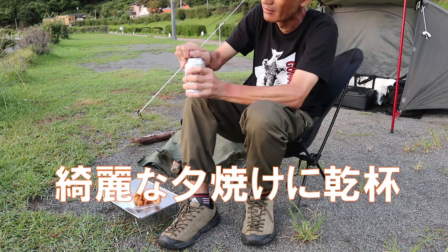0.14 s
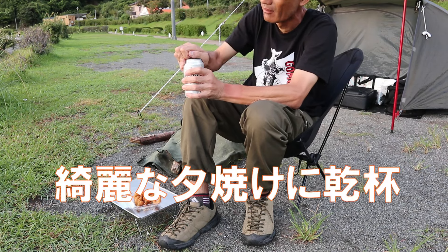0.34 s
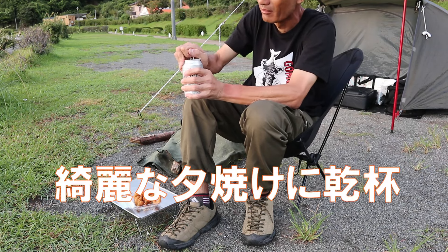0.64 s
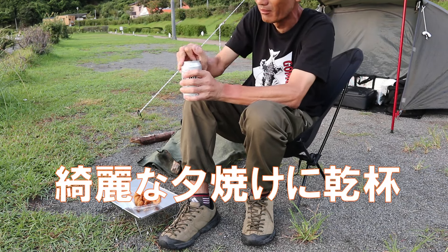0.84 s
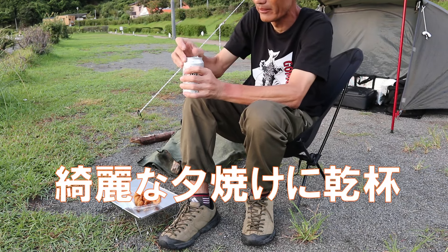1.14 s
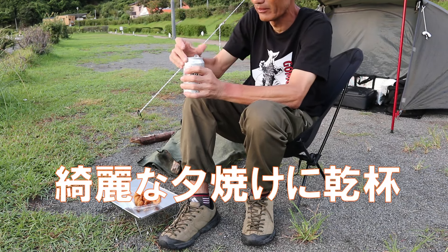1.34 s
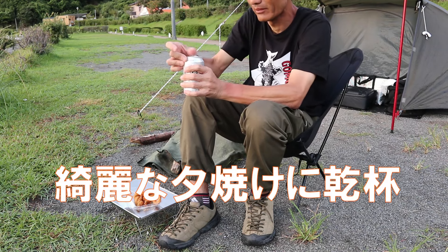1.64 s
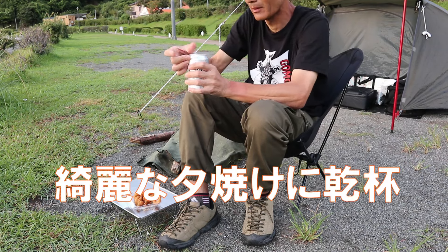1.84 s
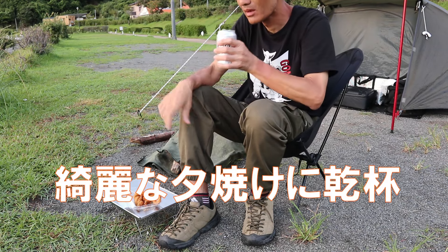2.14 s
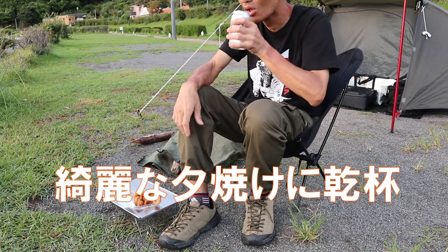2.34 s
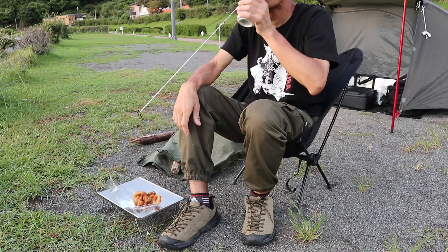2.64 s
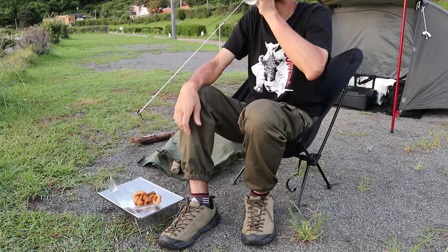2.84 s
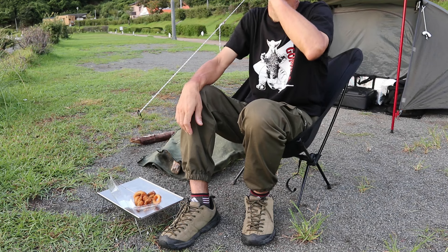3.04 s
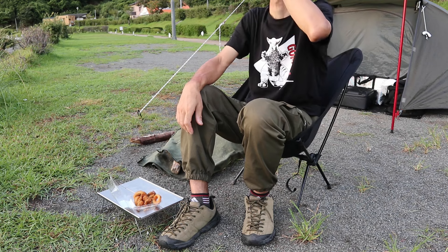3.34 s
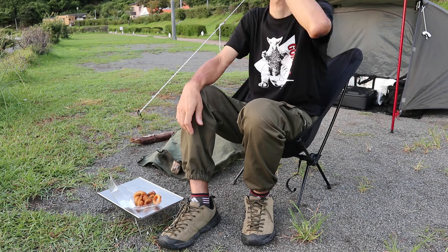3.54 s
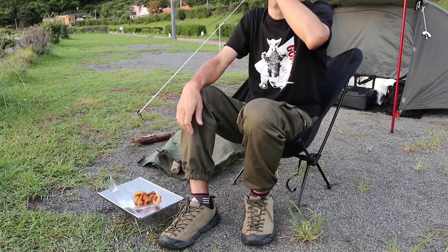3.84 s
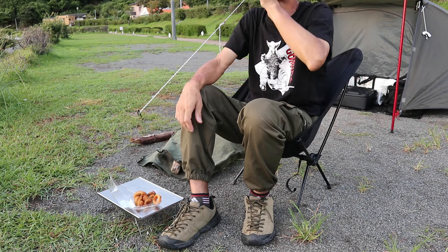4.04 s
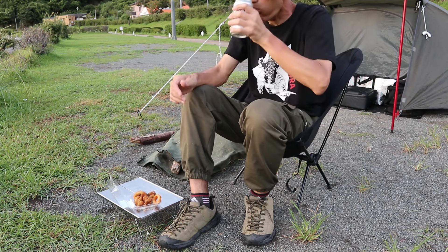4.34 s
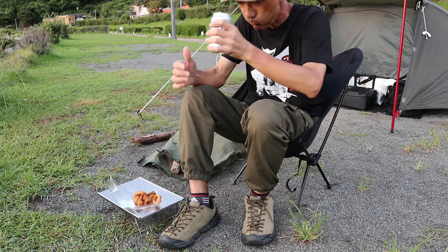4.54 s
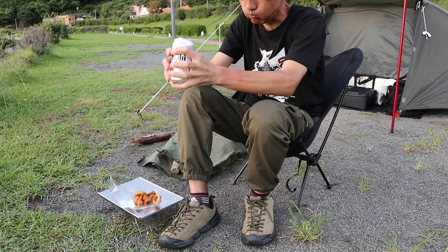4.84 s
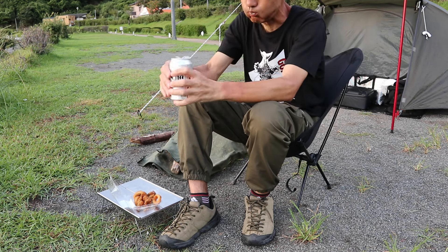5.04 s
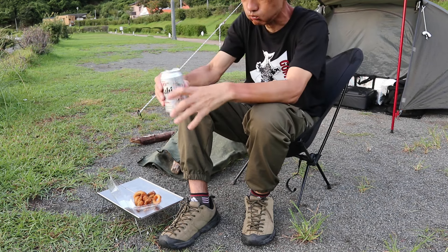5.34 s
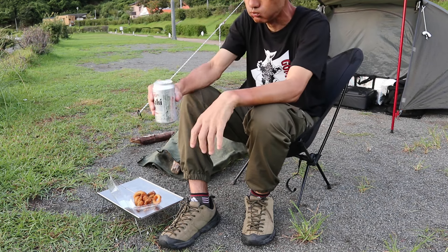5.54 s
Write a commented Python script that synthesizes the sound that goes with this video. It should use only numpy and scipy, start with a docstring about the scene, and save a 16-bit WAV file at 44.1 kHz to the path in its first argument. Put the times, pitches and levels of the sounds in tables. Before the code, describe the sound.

A quiet outdoor background opens with even leafy hiss, distant road rumble, a faint cicada note and a blurred rising bird call. At 0.34 s a drink can very close, slightly left, cracks and spurts gas for about a tenth of a second. A hard metallic snap follows at 0.42, a lesser one at 0.58, and a loud punch at 0.69, with fine tearing crackle between and small ticks until 0.87. The background ducks, then slowly recovers. Barely audible foam fizz dies quickly after 1 s. Soft cloth swishes come near 1.6, 2.0 and 4.65 s, and a tiny tick at 3.5. Cicadas buzz in gliding notes and pulses throughout; birds call at 1.2 and 2.2 s, with thin high chirps at 1.7, 2.9 and 5.1. Tyre roar swells around 2.6. A low engine drone fades in and out, rises slightly, then from 4 s grows stronger and falls in pitch to the end.

```python
"""A beer can is opened close to the microphone at a campsite: ringing metal snaps, a noisy jet of gas and fine crackle.
Around it, cloth swishes in filtered noise, and an engine drone of summed sine orders grows and ends lower in pitch.
Coloured noise makes the tyres and rumble of a far road; cicadas and birds are blurred gliding tones in the trees.
The recorder's limiter ducks the background after the loudest snaps."""
import sys
import numpy as np
from scipy import signal
from scipy.fft import rfft, irfft
from scipy.io import wavfile
from scipy.ndimage import uniform_filter1d, minimum_filter1d

SR = 44100
rng = np.random.default_rng(int(sys.argv[2]) if len(sys.argv) > 2 else 0)


def master(y):
    """Save y as 16-bit WAV."""
    cut = np.clip(np.atleast_2d(y).T, -1, 1)
    pcm = np.round(cut * 32767)  # scale
    wavfile.write(sys.argv[1], SR, pcm.astype(np.int16))


N = 251370
T = np.arange(N) / SR  # s
HZ = np.fft.rfftfreq(N, 1 / SR)

# Ringing modes of the lid and tab. Each row: pitch in Hz, relative level in dB, time to fall 60 dB in seconds.
LID_MODES = [(594, 10.5, 0.0038), (1200, -12.5, 0.015), (1464, 0, 0.013), (2370, -17, 0.011),
             (3190, -2, 0.0029), (3636, -22.5, 0.015), (4220, -7, 0.0032), (4745, -13, 0.0096),
             (5160, -8.5, 0.0023), (5790, -15, 0.01), (6600, -13, 0.0068), (7900, -18.5, 0.01),
             (8960, -17.5, 0.014), (11200, -12, 0.0033)]
# Snaps of the metal. Each row: start in seconds, flex of the lid in dB, tear in dB, pitch of the tear in Hz,
# spread over the modes in octaves.
METAL_SNAPS = [(0.3367, -28.5, 7, 5840, 0.51), (0.339, -36, -1, 11050, .15),
               (0.3385, -42, 15.5, 3790, 0.11), (0.4244, 8.5, 11, 3540, 0.46),
               (0.4254, -17, -5, 4450, 0.55), (.442, -21, -22, 4000, 1.1), (0.479, -21, -40, 5000, 0.25),
               (0.5809, -7.5, 5.5, 4915, 0.18), (0.5813, -51, -12, 10480, 0.4), (.598, -37, -27, 7100, 1.6),
               (.604, -40, -36, 7000, 1.5), (0.636, -29, -15, 8800, 0.5), (.644, -28, -23, 6460, 1.1),
               (.649, -32, -33, 7000, 1.2), (.675, -26, -43, 5830, 0.89), (0.6891, 7.5, 7.5, 5550, 1.42),
               (0.699, -31, -17, 5000, 0.45), (0.723, -42, -29, 6500, 1.4), (0.7444, -23, -36, 5040, 0.25),
               (.779, -35, -30, 6470, 1.2), (.849, -32, -29, 4500, 1.2), (3.511, -35, -27, 11500, 0.41)]
FLEX_HZ = 1563
# the lid hardly radiates between its low and its high modes: pitch of that gap and its sharpness
GAP_HZ, GAP_Q = 2120, 1.27
# the flap rings once as it is punched into the can
FLAP_S, FLAP_HZ, FLAP_DB, FLAP_T60_S = .6894, 2110, -4, 0.0046


def snaps(radiation_hz=700, edge_hz=12300, rip_db=-13, rip_hz=9000, rip_s=0.0017):
    """Each snap flexes the whole lid (low modes) and tears the metal at one pitch (high modes and a brief rip)."""
    hz, db, t60 = np.transpose(LID_MODES)
    t = np.arange(SR // 10) / SR
    out = np.zeros(N)
    decay = np.exp(-np.log(1000) * t / t60[:, None])
    modes = amp(db)[:, None] * decay * np.sin(2 * np.pi * hz[:, None] * t)
    # the higher modes swing in alternate directions
    high = hz > 2000
    modes[high] *= (-1) ** np.arange(np.sum(high))[:, None]
    for s, flex_db, tear_db, tear_hz, spread in METAL_SNAPS:
        flex = amp(flex_db) * share(hz, FLEX_HZ, spread)
        tear = amp(tear_db) * share(hz, tear_hz, spread)
        rip = cut(rng.standard_normal(len(t)) * np.exp(-t / rip_s), rip_hz, "highpass")
        rip_level = amp(tear_db + rip_db) * share(rip_hz, tear_hz, spread)
        add(out, s, (flex + tear) @ modes + rip_level * rip)
    out = signal.lfilter(*signal.iirnotch(GAP_HZ, GAP_Q, SR), out)
    flap_decay = np.exp(-np.log(1000) * t / FLAP_T60_S)
    add(out, FLAP_S, amp(FLAP_DB) * flap_decay * np.sin(2 * np.pi * FLAP_HZ * t))
    # so small a lid radiates no bass, and no tear is perfectly sudden
    return cut(cut(out, radiation_hz, "highpass"), edge_hz, "lowpass", order=5)


# Colour of the escaping jet. Each row: frequency in Hz, relative level in dB per Hz.
JET_COLOUR = [(150, -26), (450, -8), (650, -1), (850, -5.5), (1150, -7), (2000, -12), (2500, -7),
              (3200, -2), (3900, -5), (5200, -0.5), (6200, -3.5), (7600, -8.5), (9800, 1.5), (12000, -0.5),
              (13500, -9), (16000, -42)]
# The jet surges as the tab is levered further, then runs out. Each row: time in seconds, level in dB.
JET_FLOW = [(.337, -18), (.342, -30), (.347, -24.5), (.361, -25), (.37, -24), (.385, -26.5), (.401, -30),
            (.42, -32.5), (.44, -41), (.5, -86)]
# the gas escapes from the moment the seal cracks; its hum sags, then dies fast after the hold
SEAL_S, GAS_ATTACK_S, GAS_HOLD_S = .3365, 0.0023, 0.079
HUM_DB, HUM_SAG_DB_PER_S, HUM_RELEASE_DB_PER_S = -34.5, 34, 330
SLIT_NARROW_HZ, SLIT_WIDE_HZ, SLIT_WIDENS_S = 6200, 4780, 0.029


def gas(whistle_db=-7, upper_mode=1.87, spray_db=-6, drops_per_s=900):
    """A sputtering jet full of droplets, whose two rough whistles sink as the slit widens; it also makes the can hum."""
    age, spent = since(SEAL_S), since(SEAL_S + GAS_HOLD_S)
    hum_db = HUM_DB - HUM_SAG_DB_PER_S * age - HUM_RELEASE_DB_PER_S * spent
    slit_hz = SLIT_WIDE_HZ + (SLIT_NARROW_HZ - SLIT_WIDE_HZ) * np.exp(-age / SLIT_WIDENS_S)
    whistles = fuzzy(slit_hz, width=1700) + fuzzy(upper_mode * slit_hz, width=380)
    drops = unit(rng.standard_normal(N) * (rng.random(N) < drops_per_s / SR))
    rush = rng.standard_normal(N) + amp(spray_db) * drops
    hiss = unit(irfft(rfft(rush) * amp(read(JET_COLOUR, HZ)), N))
    jet = unit(hiss + amp(whistle_db) * whistles)
    hum = unit(fuzzy(np.full(N, 1520.), width=360) + amp(-10.5) * fuzzy(np.full(N, 1150.), width=210))
    sputter_db = 2.0 * wander(rate_hz=250)
    onset = np.minimum(age / GAS_ATTACK_S, 1)
    return (jet * amp(curve(JET_FLOW) + sputter_db) + hum * amp(hum_db)) * onset


# Bursts of fine crackle as the score line tears and the tab is bent back.
# Each row: peak time in seconds, level in dB before the tick and ring trims.
TEAR_BURSTS = [(.586, -38), (.628, -47), (0.64, -37), (.676, -61), (.697, -35), (.710, -38), (.853, -46),
               (.866, -52)]
TEAR_RISE_DB_PER_S, TEAR_FALL_DB_PER_S, RING_FALL_DB_PER_S = 2800, 1400, 850
# the foam settles in the open can; its level is also before the trims
FOAM_S, FOAM_DB, FOAM_FALL_DB_PER_S = 1, -66, 62


def crackle(per_s=3000, tick_db=-4, ring_db=-2):
    """Tiny random ticks of tearing metal and settling foam; the lid's ring outlasts each burst."""
    ticks = rng.standard_normal(N) * (rng.random(N) < per_s / SR)
    bright = unit(cut(cut(ticks, hz=2800, kind="highpass"), hz=10700, kind="lowpass", order=8))
    ring = unit(resonate(resonate(ticks, 1430, width=170), 1730, width=210))

    def bursts(fall):
        return sum(amp(db - np.maximum(TEAR_RISE_DB_PER_S * (s - T), fall * (T - s))) for s, db in TEAR_BURSTS)

    tearing, ringing = bursts(TEAR_FALL_DB_PER_S), bursts(RING_FALL_DB_PER_S)
    foam = amp(FOAM_DB - FOAM_FALL_DB_PER_S * since(FOAM_S)) * (T > FOAM_S)
    return amp(tick_db) * bright * (tearing + foam) + amp(ring_db) * ring * (ringing + foam)


# Clothes brush as the arms move. Each row: middle in seconds, width to either side in seconds, level in dB.
CLOTH_STROKES = [(1.605, 0.022, -63), (1.977, .07, -64), (4.655, .025, -62)]


def clothes(low_hz=5000, high_hz=12000, grain_db=3):
    """Soft, grainy swishes of cloth: band-limited noise, unevenly loud, under bell-shaped strokes."""
    fibres = cut(cut(rng.standard_normal(N), low_hz, "highpass"), high_hz, "lowpass", order=8)
    strokes = sum(amp(db) * np.exp(-((T - s) / width) ** 2) for s, width, db in CLOTH_STROKES)
    return unit(fibres * amp(grain_db * wander(rate_hz=120))) * strokes


def campsite(x, echo_s=0.001873, echo_gain=0.67, echo_hz=2300, scatter_db=-28, t60=0.27, left_db=4.0):
    """The chest behind the can sends back one dull echo; ground, chair and tent scatter a faint tail."""
    echo = echo_gain * np.exp(-2j * np.pi * HZ * echo_s) / (1 + (HZ / echo_hz) ** 2)
    direct = rfft(x) * (1 + echo)
    # the can is a little to the left: earlier there, and louder in the treble
    lean = amp(left_db / 2 * HZ / (HZ + 900))
    lag = np.exp(-2j * np.pi * HZ * 1e-5)
    near = irfft(np.array([direct * lean, direct * lag / lean]), N)
    t = np.arange(SR // 2) / SR
    sparse = rng.standard_normal((2, len(t))) * (rng.random((2, len(t))) < .08)
    taps = sparse * (t > .004) * np.exp(-np.log(1000) * t / t60)
    taps /= np.linalg.norm(taps, axis=1, keepdims=True)
    return near + amp(scatter_db) * signal.fftconvolve(x[None], taps, axes=1)[:, :N]


# The engine's firing rate, before a slight wobble. Each row: time in seconds, rate in Hz.
FIRING_RATE = [(0, 85.18), (1.5, 84.8), (2.2, 87.1), (3.3, 88.6), (4.05, 86.9), (4.55, 81.27), (5.7, 74.3)]
# Its deepest tone, which fades in and out on its way over the ground.
# Each row: time in seconds, level in dB before trim and flutter.
DEEP_TONE = [(0.0, -49), (0.22, -80), (0.28, -43.5), (1.24, -57), (1.51, -38.5), (1.63, -55.5), (2.18, -37),
             (2.36, -57), (2.4, -43), (2.79, -42), (2.86, -33), (3.49, -35.5), (3.68, -48), (3.86, -35),
             (4.08, -31), (4.16, -39.5), (4.3, -29), (4.7, -31.5), (5.02, -26), (5.16, -30), (5.7, -29)]
# Its orders. Each row: multiple of the firing rate, relative level in dB.
ENGINE_ORDERS = [(1.25, -15.5), (1.751, -14.5), (2, -8.5), (2.75, -14), (3, -16), (4, -28)]
# Its overtones come forward as the exhaust opens up.
# Each row: time in seconds, gain of the low overtones in dB, gain of the high overtones in dB.
OVERTONE_GAINS = [(0, -40, -48), (.18, -40.5, -36), (.4, -45, -51), (1.2, -45, -57), (2.1, -44.5, -43),
                  (2.42, -40.5, -36.5), (2.7, -40.5, -43.5), (4.05, -40, -40.5), (4.36, -37.5, -24.5),
                  (4.65, -30, -32), (5, -34, -33.5), (5.7, -26.5, -28)]


def engine(drone_db=-0.5, flutter_db=1.0, fading_db=1.9, lag_s=4.5e-5):
    """Exhaust orders share one pitch, which rises a little, then falls; the left side hears it a little earlier."""
    turns = np.cumsum(curve(FIRING_RATE) * (1 + 0.00475 * wander(rate_hz=8.8))) / SR
    low, high = amp(curve(OVERTONE_GAINS))
    drone_level = amp(curve(DEEP_TONE) + drone_db + flutter_db * wander(rate_hz=3.6))
    sound = np.sin(2 * np.pi * turns) * drone_level
    for k, db in ENGINE_ORDERS:
        level = (low if round(k) <= 2 else high) * amp(db + fading_db * wander(rate_hz=5.2))
        sound += level * np.sin(2 * np.pi * k * turns + 0.58 * wander(rate_hz=1.9))
    return np.sqrt(2) * np.array([sound, np.interp(T - lag_s, T, sound)])


# Cicada notes. Each row: start in seconds, length in seconds, pitch in Hz, glide in Hz per second,
# level in dB before trim and flutter.
CICADA_NOTES = [(0.149, .2, 3500, 2300, -58), (.84, 0.28, 4870, 1000, -60), (1.033, 0.22, 4830, -3000, -60),
                (1.25, .17, 3350, 3700, -60), (1.385, 0.24, 4310, 800, -56), (1.672, 0.51, 4440, -280, -57),
                (2.457, 0.21, 5490, -900, -57), (2.63, 0.17, 4800, -1300, -59),
                (2.757, 0.21, 4540, -3500, -54), (3.0, .1, 3950, 7500, -62), (3.058, 0.11, 4840, 0, -55.5),
                (3.116, 0.3, 4540, -1900, -55.5), (3.645, 0.15, 4850, 400, -56),
                (3.752, 0.12, 4370, -200, -53), (3.851, .22, 4420, 207, -54),
                (4.027, 0.41, 4410, -560, -51.5), (4.42, 0.12, 4170, -4000, -56),
                (4.907, 0.32, 4500, 197, -55), (5.212, 0.39, 4310, -450, -55.5),
                (5.559, 0.15, 4210, -4200, -56)]
# Trains of short pulses. Each row: start in seconds, length in seconds.
PULSE_TRAINS = [(0.037, .29), (1.514, .63), (3.17, .4), (4.592, .4)]
PULSE_PERIOD_S = 0.119
# every note scoops up to its pitch as it swells and droops as it fades (fractions of the pitch)
NOTE_ATTACK_S, NOTE_RELEASE_S, SCOOP, DROOP = 0.0409, 0.042, 0.0347, 0.047
# above the usual pitch, the higher the note, the rougher: blur grows by this power
BLUR_HZ, USUAL_HZ, BLUR_GROWTH = 55.8, 4383, 5.1


def cicada(song_db=-0.5, pulse_db=-57.5, pulse_hz=5090, pulse_s=0.024, chorus_db=-66, chorus_hz=5130):
    """A narrow, fluttering buzz in gliding notes, with trains of short pulses, over a thin far chorus."""
    song = np.zeros(N)
    for s, length, hz, glide_hz_per_s, db in CICADA_NOTES:
        blur_hz = BLUR_HZ * max(hz / USUAL_HZ, 1) ** BLUR_GROWTH
        t = np.arange(0, length, 1 / SR)
        swell = np.minimum(t / NOTE_ATTACK_S, 1)
        fade = np.minimum((length - t) / NOTE_RELEASE_S, 1)
        bend = 1 - SCOOP * (1 - swell) ** 2 - DROOP * (1 - fade) ** 2
        pitch = (hz + glide_hz_per_s * t) * bend
        add(song, s, amp(db) * np.sqrt(swell * fade) * buzz(pitch, blur_hz))
    flutter_db = 2.0 * wander(rate_hz=30)
    beats = np.concatenate([s + np.arange(0, length, PULSE_PERIOD_S) for s, length in PULSE_TRAINS])
    envelope = sum(np.exp(-((T - s) / pulse_s) ** 2) for s in beats)
    pulses = fuzzy(np.full(N, pulse_hz), width=210) * envelope * amp(pulse_db)
    chorus = amp(chorus_db) * fuzzy(np.full(N, chorus_hz), width=200)
    return song * amp(song_db + flutter_db) + pulses + chorus


# Bird calls. Each row: start in seconds, length in seconds, start pitch in Hz, end pitch in Hz,
# curl (above 1 the glide comes late), level in dB before the ragged wavering.
BIRD_CALLS = [(0.049, 0.3, 1690, 2290, 1.9, -56), (1.239, 0.23, 1730, 2750, 3.85, -54),
              (1.672, 0.11, 7150, 7600, .6, -62), (2.239, 0.26, 1777, 2120, 1.8, -51),
              (2.933, 0.125, 7050, 7750, .7, -60.5), (5.064, .13, 7100, 7700, .6, -60.5)]


def birds(blur=0.06, ragged_db=2):
    """Far calls that glide upward, blurred and made ragged by the trees."""
    out = np.zeros(N)
    for s, length, start_hz, end_hz, curl, db in BIRD_CALLS:
        u = np.linspace(0, 1, int(length * SR))
        hz = start_hz + (end_hz - start_hz) * u ** abs(curl)
        add(out, s, amp(db) * fuzzy(hz, width=blur * start_hz) * signal.windows.tukey(len(hz), .3))
    return out * amp(ragged_db * wander(rate_hz=28))


def trees(source, shared=0.34):
    """A caller in the trees: part of its sound is common to both ears, the rest comes scattered."""
    shared = np.clip(shared, 0, 1)
    return np.sqrt(shared) * source() + np.sqrt(1 - shared) * np.array([source(), source()])


# Low rumble of the traffic. Each row: frequency in Hz, relative level in dB per Hz.
RUMBLE_COLOUR = [(15, -1), (30, -18), (60, 4.5), (90, -0.5), (125, 2), (170, -3.5), (235, -0.5),
                 (300, -9.5), (420, -24.5), (900, -50.5)]
# Tyre roar of near vehicles. Each row: frequency in Hz, relative level in dB per Hz.
NEAR_TYRES = [(100, -30), (330, -0.5), (520, 0.5), (850, 0.5), (1300, -4), (2000, -9), (3000, -15.5),
              (5000, -24), (9000, -47)]
# Tyre roar of far vehicles. Each row: frequency in Hz, relative level in dB per Hz.
FAR_TYRES = [(100, -3), (330, -6.5), (500, -7), (900, 2.5), (1100, -0.5), (1500, -9), (2300, -12.5),
             (3500, -20.5), (7000, -50)]
# Vehicles on the road. Each row: time when closest in seconds, tyre roar in dB,
# time taken to swell or fade in seconds, share of the near spectrum from 0 to 1.
VEHICLES = [(2.58, -41.5, 0.63, 0.93), (4.55, -45, 2.18, 0)]
# the rumble grows steadily; the rest of the road roars evenly, all in the near spectrum
RUMBLE_DB, RUMBLE_RISE_DB_PER_S = -47.5, 1.96
ROAD_DB, ROAD_NEAR = -54, 1


def road(falloff=2.62):
    """Rumble, and tyre roar that swells and fades as each vehicle goes by, broader for a near one."""
    powers = [amp(db) ** 2 / (1 + ((T - s) / swell_s) ** 2) ** falloff for s, db, swell_s, _ in VEHICLES]
    powers = np.array(powers + [np.full(N, amp(ROAD_DB) ** 2)])
    near = np.clip([row[-1] for row in VEHICLES] + [ROAD_NEAR], 0, 1)
    near_roar = np.sqrt(near @ powers) * diffuse(NEAR_TYRES)
    far_roar = np.sqrt((1 - near) @ powers) * diffuse(FAR_TYRES)
    rumble_db = RUMBLE_DB + RUMBLE_RISE_DB_PER_S * T + 0.84 * wander(rate_hz=7.5)
    rumble = diffuse(RUMBLE_COLOUR) * amp(rumble_db)
    return rumble + (near_roar + far_roar) * amp(0.45 * wander(rate_hz=35))


# Hiss of leaves and far insects. Each row: frequency in Hz, relative level in dB per Hz.
AIR_COLOUR = [(200, -3), (900, 5), (1300, -2), (2000, 3.5), (3000, -2.5), (4000, -1.5), (4800, -1.5),
              (5200, -5.5), (5700, -6.5), (6300, -3.5), (7300, -10.5), (10500, -13.5), (13000, -26.5),
              (16000, -46.5)]


def air(level_db=-49.0):
    """An even hiss of leaves and far insects: steady coloured stereo noise."""
    return amp(level_db) * diffuse(AIR_COLOUR)


# Correlation of left and right in the background noise: alike in the bass, opposed in the highest treble.
# Each row: frequency in Hz, correlation from -1 to 1.
LEFT_RIGHT_CORRELATION = [(60, 0.99), (130, 1), (290, 0.77), (640, 0.52), (1400, 0.52), (3100, 0.22),
                          (7000, -0.26), (15000, -1)]


def diffuse(spectrum):
    """Coloured stereo noise: left and right alike in the bass, increasingly opposed in the treble."""
    a, b = rfft(rng.standard_normal((2, N)))
    same = np.clip(read(LEFT_RIGHT_CORRELATION, HZ), -1, 1)
    mid, side = a * np.sqrt(1 + same), b * np.sqrt(1 - same)
    return unit(irfft(np.array([mid + side, mid - side]) * amp(read(spectrum, HZ)), N))


def amp(db):
    """Decibels to gain."""
    return 10 ** (np.asarray(db) / 20)


def unit(x):
    """Scales to rms 1."""
    return x / np.sqrt(np.mean(x ** 2) + 1e-20)


def curve(rows):
    """Every column of a time table, sample by sample."""
    s, *columns = np.transpose(rows)
    return np.squeeze([np.interp(T, s, c) for c in columns])


def read(points, hz):
    """A spectrum table on a log-frequency axis."""
    f, value = np.transpose(points)
    return np.interp(np.log(hz + 1), np.log(f + 1), value)


def add(mix, s, sound):
    """Mixes a sound in at time s."""
    part = mix[max(round(s * SR), 0):][:len(sound)]
    part += sound[:len(part)]


def since(s):
    """Seconds gone by after time s, zero before it."""
    return np.maximum(T - s, 0)


def share(hz, centre_hz, spread):
    """How strongly a blow centred on one pitch drives another."""
    return 1 / (1 + (np.log2(hz / centre_hz) / spread) ** 2) ** 2


def wander(rate_hz, size=N):
    """Slow random wavering of rms 1: noise kept mostly below rate_hz."""
    hz = np.fft.rfftfreq(size, 1 / SR)
    return unit(irfft(rfft(rng.standard_normal(size)) / (1 + (hz / rate_hz) ** 4), size))


def cut(x, hz, kind, order=3):
    """A high-pass or a low-pass."""
    return signal.sosfilt(signal.butter(order, min(hz, SR / 2 - 1), kind, fs=SR, output="sos"), x)


def resonate(x, hz, width):
    """A resonance that may follow a moving pitch: shift it to zero, smooth, shift back."""
    turn = np.exp(2j * np.pi * np.cumsum(hz * np.ones(len(x))) / SR)
    r = np.exp(-np.pi * abs(width) / SR)
    return 2 * (turn * signal.lfilter([1 - r], [1, -r], x / turn)).real


def fuzzy(hz, width):
    """Noise through the same resonance twice: a rough whistle along hz."""
    return unit(resonate(resonate(rng.standard_normal(len(hz)), hz, width), hz, width))


def buzz(hz, blur_hz, fuzz_db=-3, fuzz_widths=3):
    """A steady tone of unsteady pitch, wrapped in its own blur."""
    turns = np.cumsum(hz + blur_hz * wander(rate_hz=131, size=SR)[:len(hz)]) / SR
    tone = np.sqrt(2) * np.sin(2 * np.pi * turns)
    return unit(tone + amp(fuzz_db) * fuzzy(hz, width=fuzz_widths * blur_hz))


def scene():
    """The can close by, over the engine, the callers in the trees, the road and an even hiss."""
    can = campsite(snaps() + gas() + crackle() + clothes())
    return can + engine() + trees(cicada) + trees(birds) + road() + air()


def record(dry, ceiling_db=3, recovery_db_per_s=10, edge_hz=16300):
    """A peak limiter that clamps at once and recovers slowly, soft overload on the peaks, then the band limit."""
    peak_db = 20 * np.log10(abs(dry).max(0) + 1e-9)
    fall = T * recovery_db_per_s
    held_db = np.maximum.accumulate(peak_db + fall) - fall
    over_db = np.maximum(held_db - ceiling_db, 0)
    gain_db = uniform_filter1d(minimum_filter1d(-over_db, size=41), size=41)
    ends = signal.windows.tukey(N, .001)  # very short fades at both ends
    lowpass = signal.firwin(511, edge_hz, window=("kaiser", 9), fs=SR)
    return signal.oaconvolve(np.tanh(dry * amp(gain_db)) * ends, lowpass[None], "same")


dry = scene()
out = record(dry)
master(out)
```